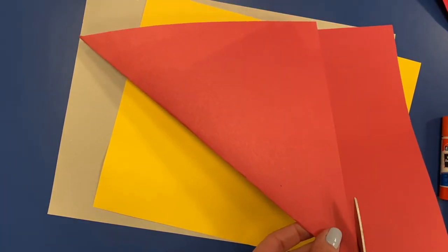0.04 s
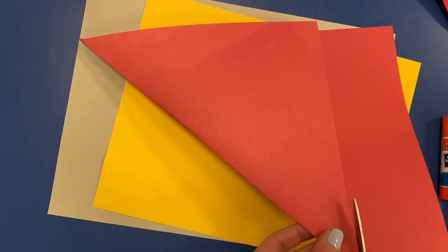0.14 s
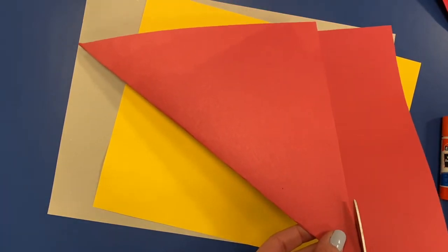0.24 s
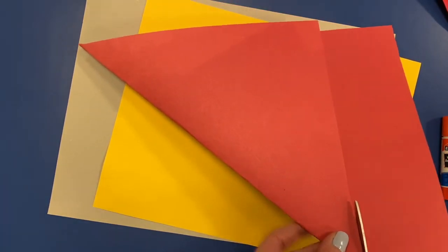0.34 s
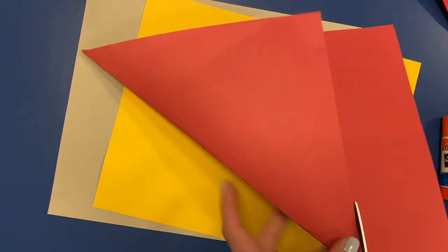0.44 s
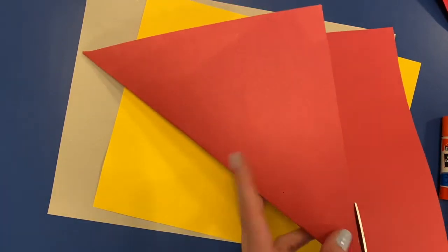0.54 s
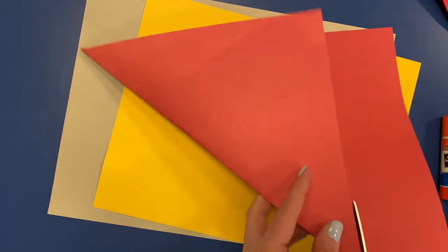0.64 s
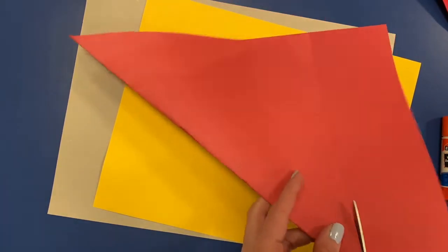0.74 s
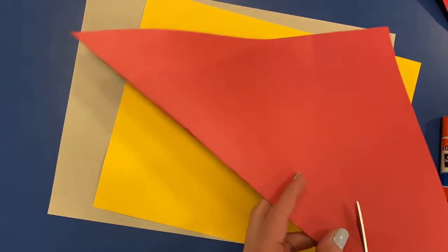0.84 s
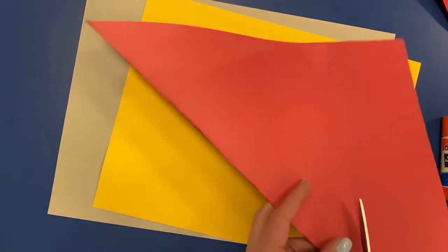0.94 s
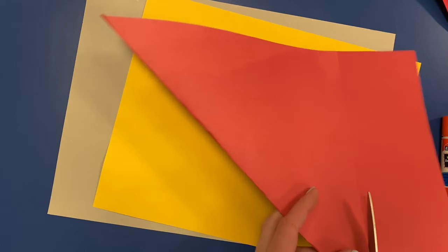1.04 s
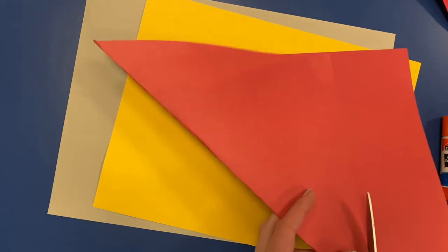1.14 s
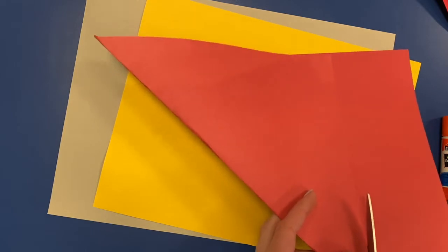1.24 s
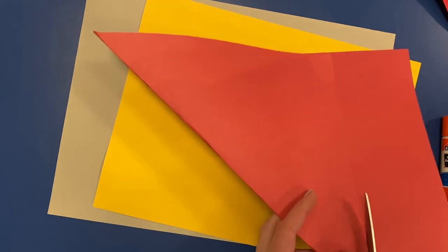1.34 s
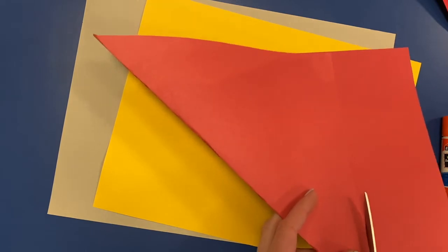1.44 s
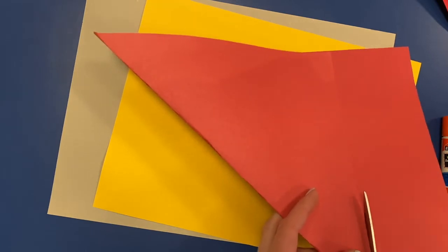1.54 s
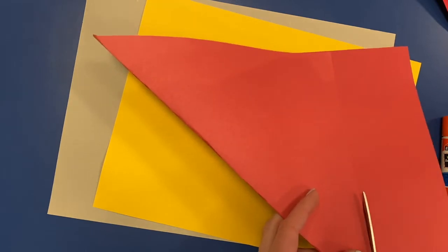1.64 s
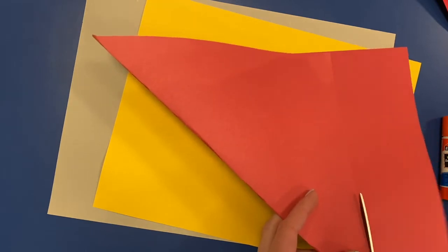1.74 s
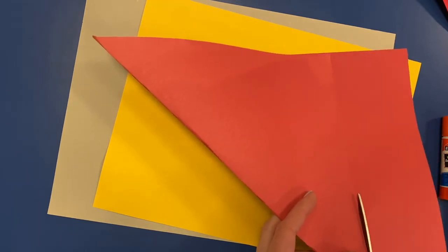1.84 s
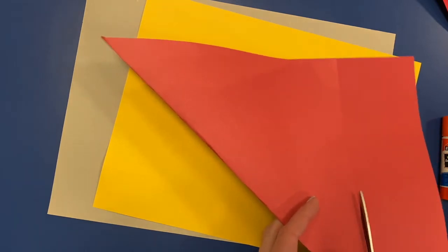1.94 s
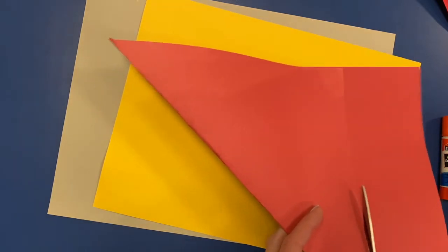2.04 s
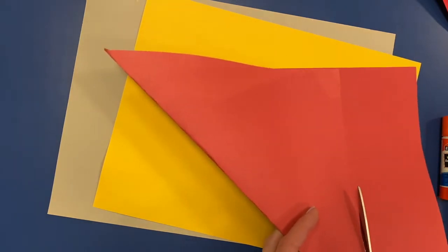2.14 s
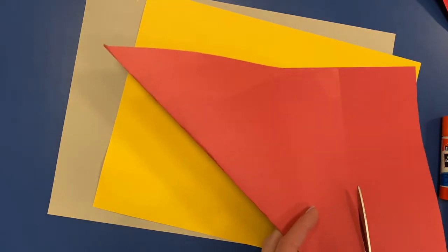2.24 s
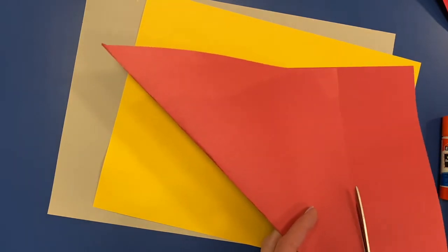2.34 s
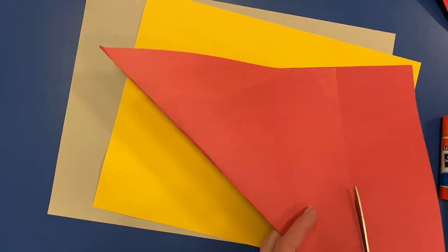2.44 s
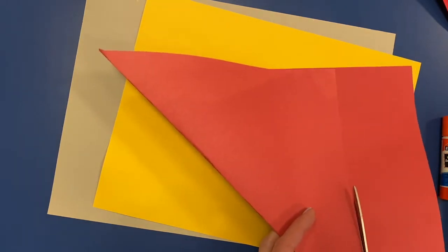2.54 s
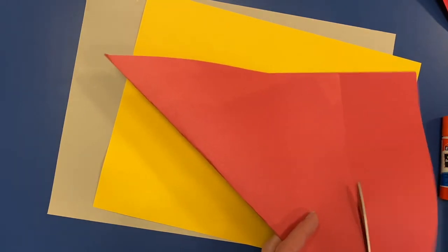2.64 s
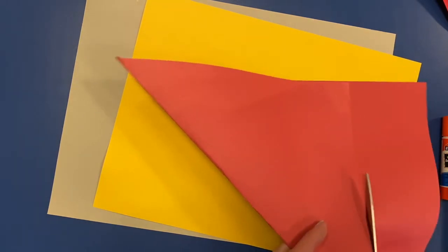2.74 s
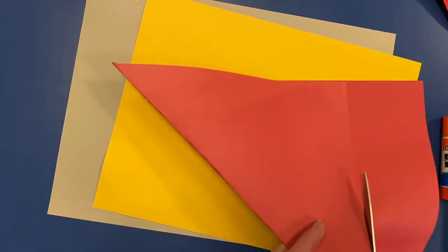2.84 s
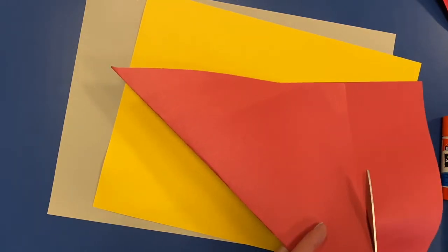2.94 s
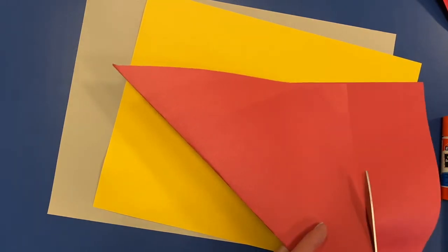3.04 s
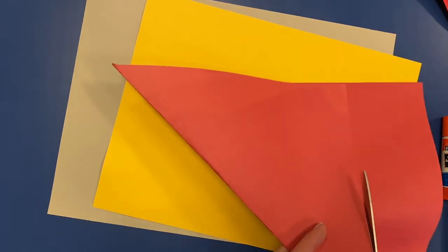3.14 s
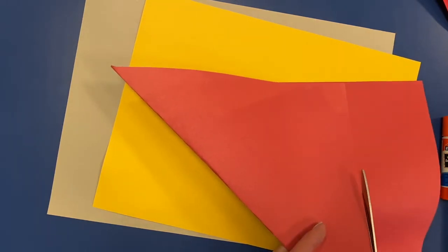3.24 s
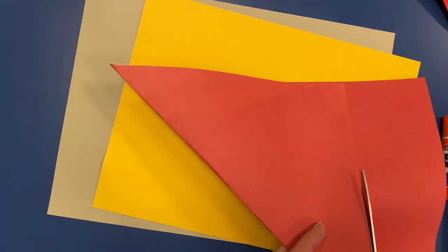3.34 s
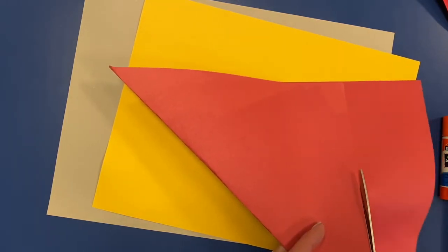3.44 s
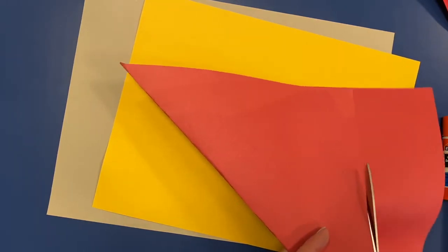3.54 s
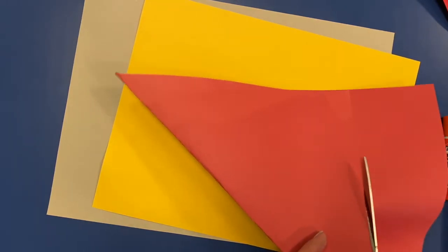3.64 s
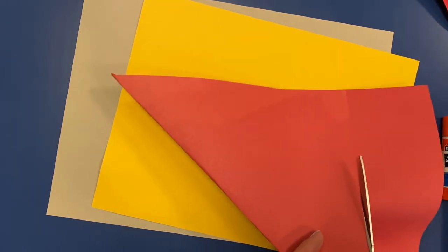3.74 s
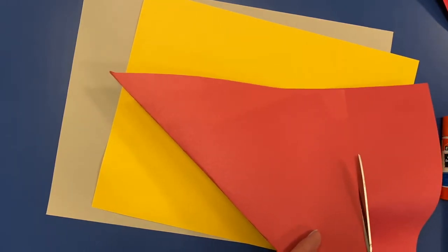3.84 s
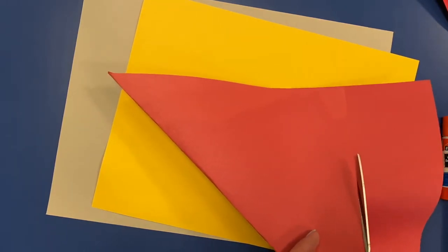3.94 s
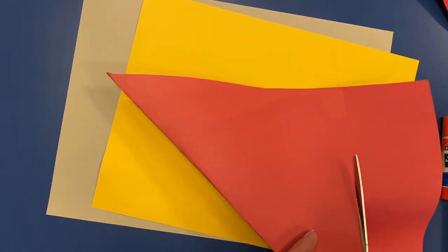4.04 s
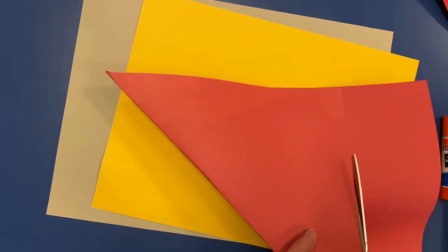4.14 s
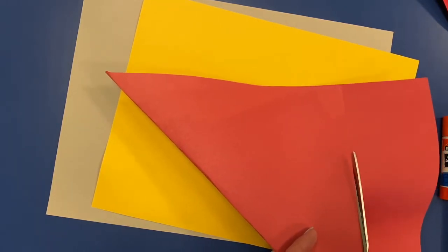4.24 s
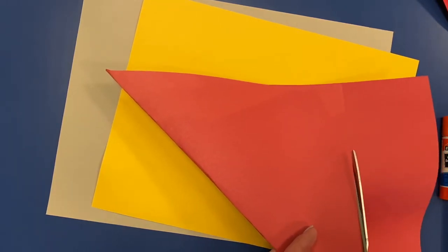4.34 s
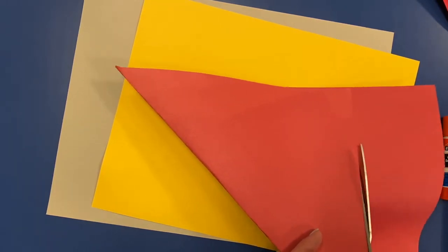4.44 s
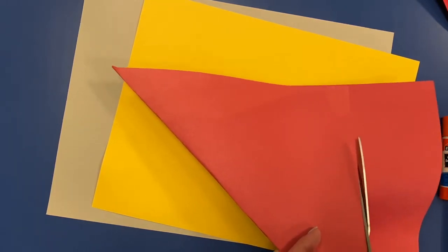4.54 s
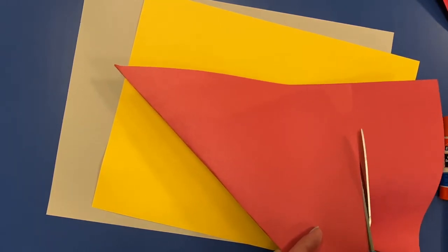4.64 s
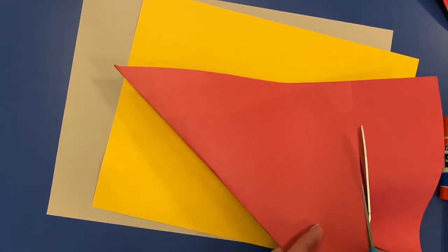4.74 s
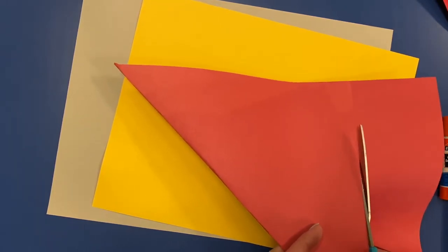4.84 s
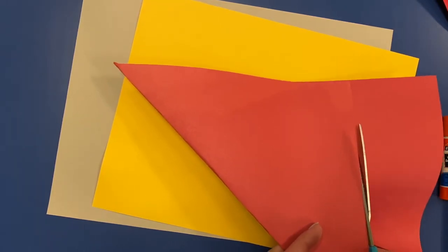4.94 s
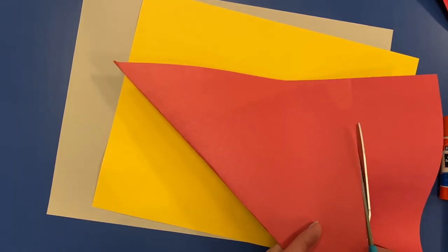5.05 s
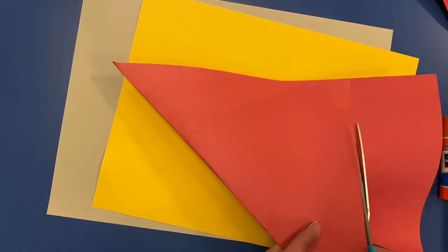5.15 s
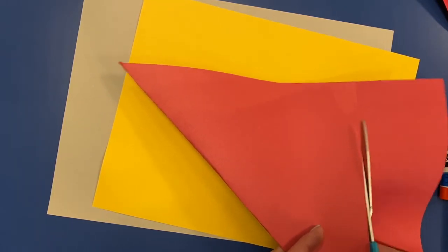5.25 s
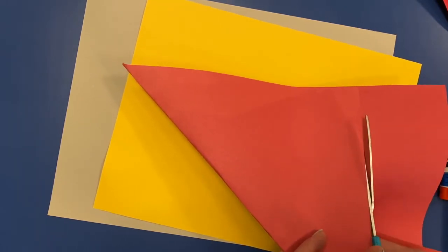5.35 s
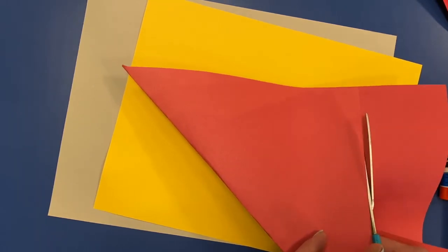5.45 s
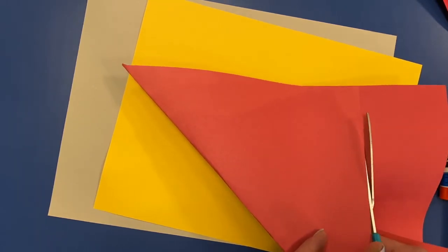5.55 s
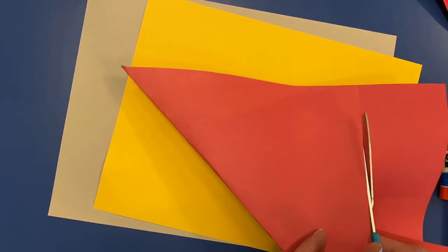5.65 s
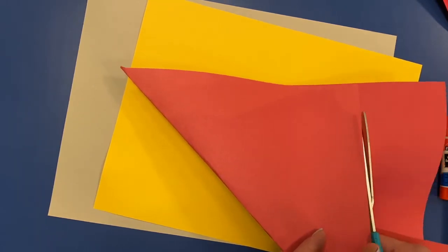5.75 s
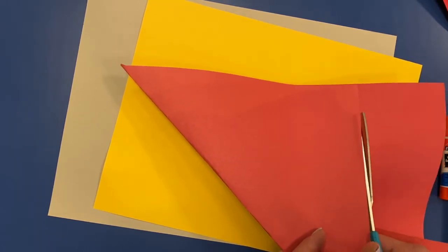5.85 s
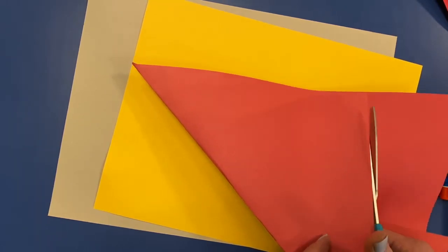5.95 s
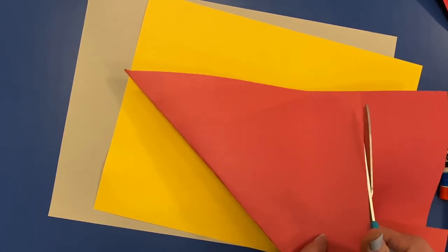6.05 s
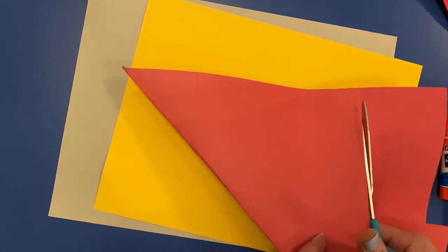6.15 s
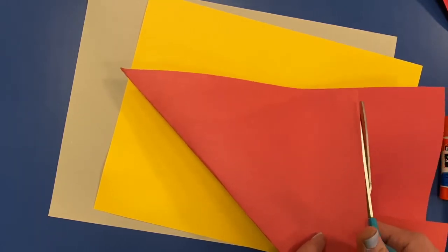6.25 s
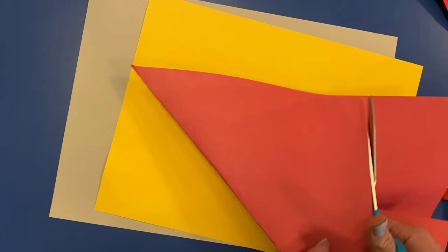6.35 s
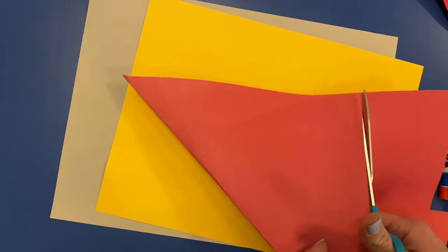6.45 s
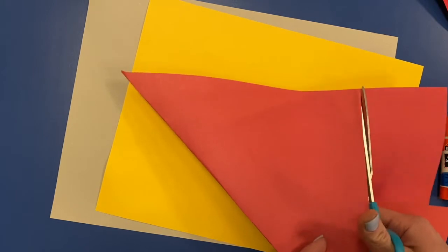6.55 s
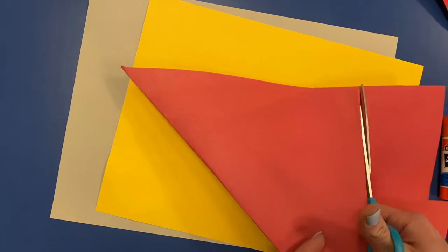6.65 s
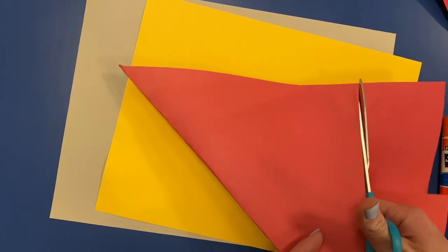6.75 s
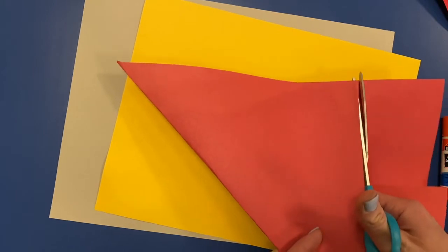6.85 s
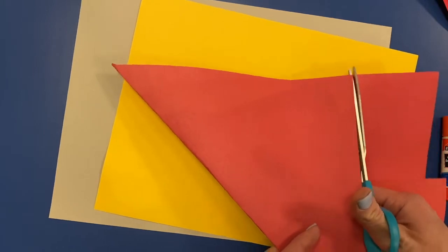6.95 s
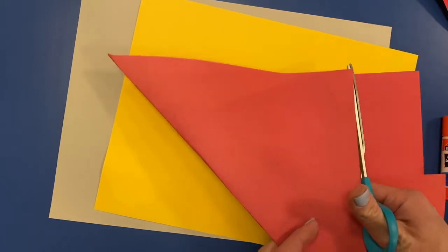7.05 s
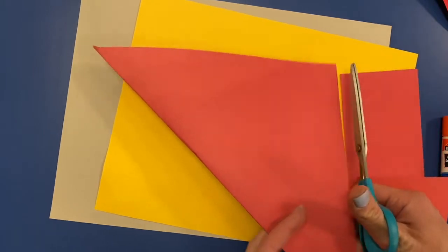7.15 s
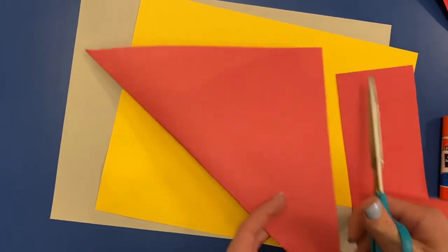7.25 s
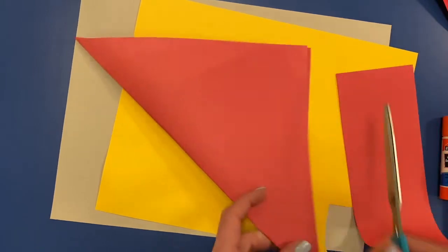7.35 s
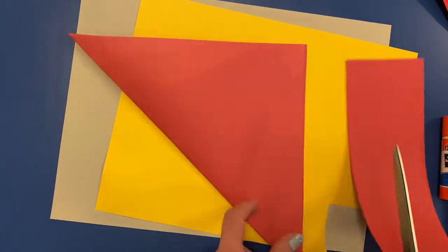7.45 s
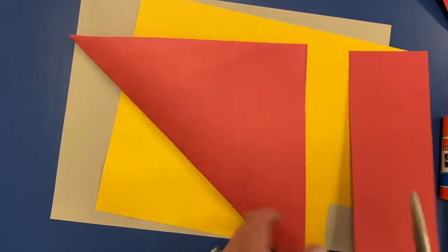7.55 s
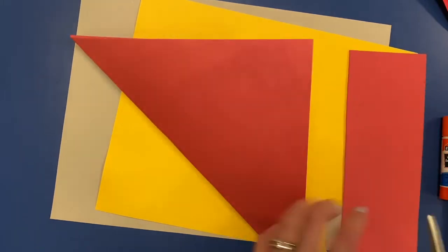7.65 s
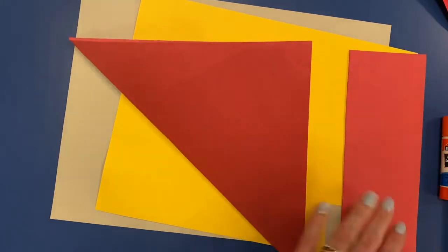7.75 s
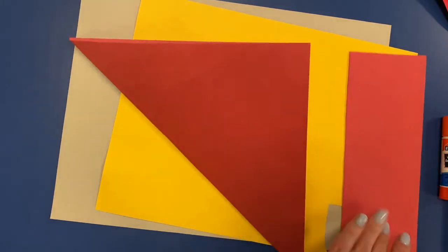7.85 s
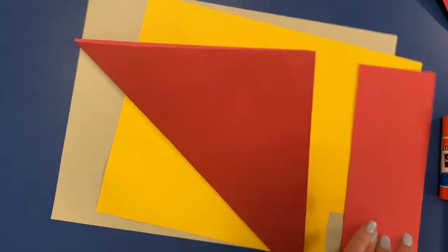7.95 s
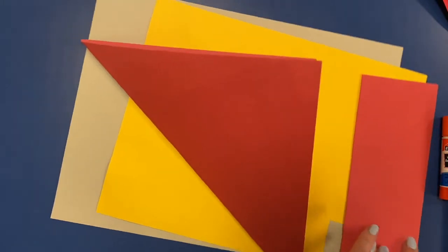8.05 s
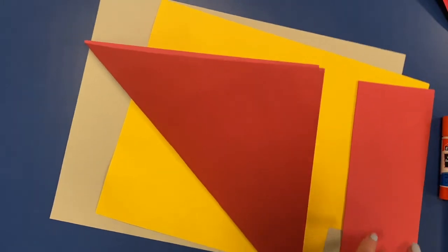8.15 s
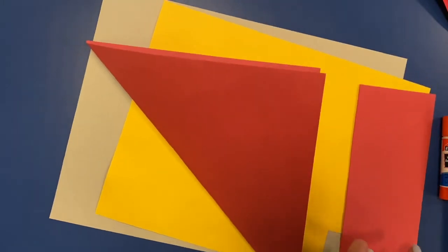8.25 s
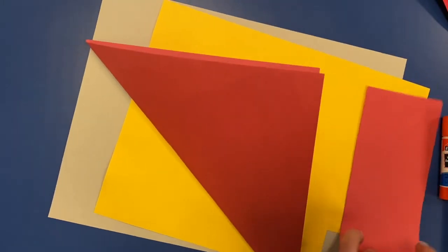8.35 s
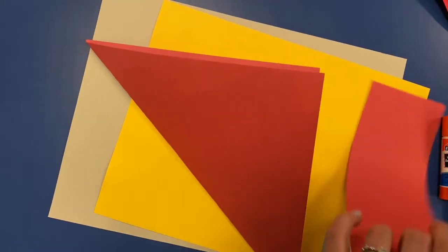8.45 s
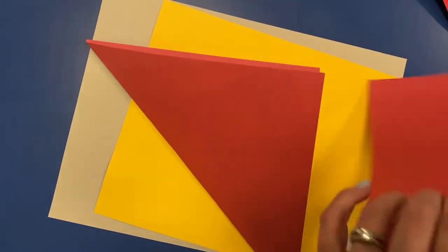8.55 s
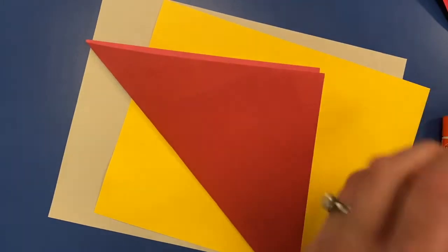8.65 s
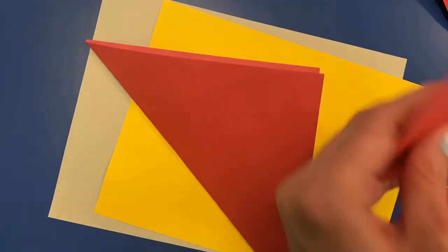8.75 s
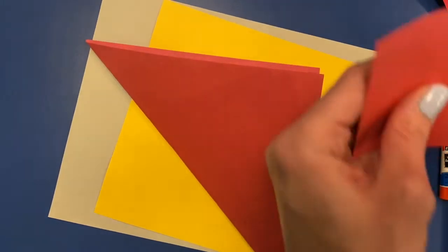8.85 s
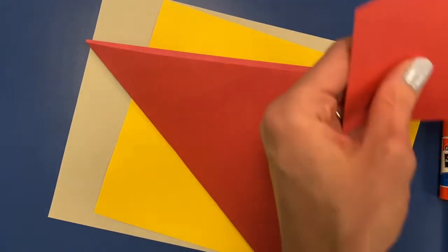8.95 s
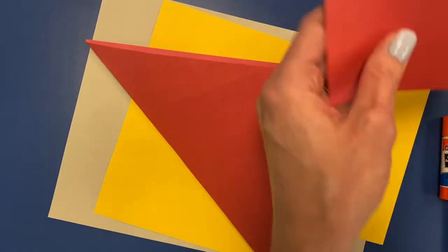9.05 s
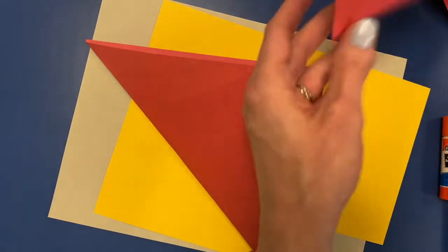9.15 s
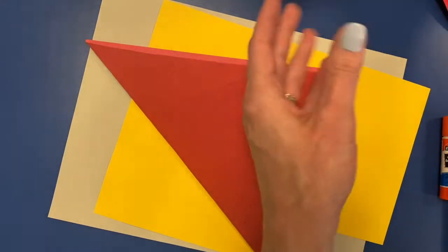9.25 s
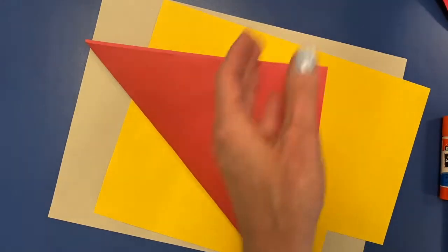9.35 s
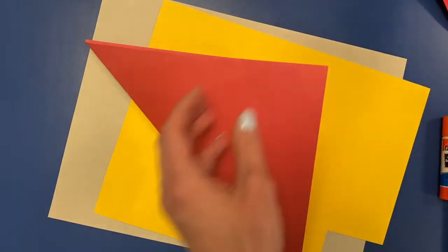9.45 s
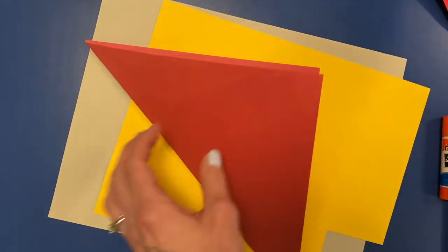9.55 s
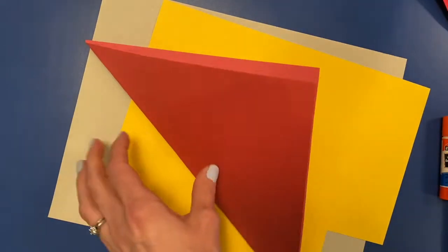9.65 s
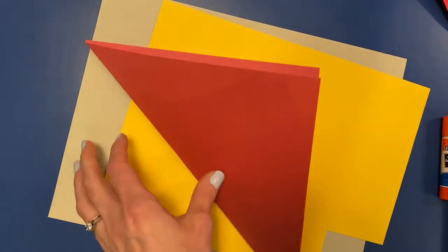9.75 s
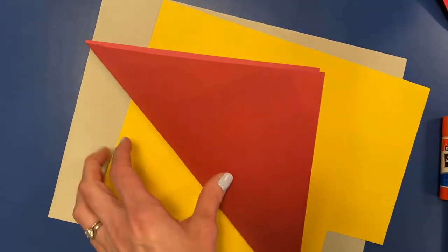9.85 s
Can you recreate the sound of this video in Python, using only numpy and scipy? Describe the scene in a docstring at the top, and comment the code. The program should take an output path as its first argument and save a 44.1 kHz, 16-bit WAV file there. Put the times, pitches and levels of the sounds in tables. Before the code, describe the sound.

Stiff paper rubs and rustles softly on a table, then scissors work through it in short uneven rasps with dry snaps and a slight metallic edge. The cuts grow louder towards a firm final snip. Afterwards the paper slides, snaps sharply once as the strip is lifted, and settles with faint rustles. Close stereo pickup in a small, quiet room with low ventilation hum.

```python
"""Short papery rasps and sharp snaps over a faint room hum: scissors work through a folded sheet of stiff
paper in jerky slips of the blades; the sheet rubs and rustles on a table, then hands lift the strip away.
Bursts of noise, shaped by force, excite resonances of sheet and blades and the colour of breaking fibres;
decaying tones make the thumps. A decaying-noise echo, ventilation noise and two wavering hum tones
surround them; paper and air are widened to stereo by phase, level and likeness of left and right."""
import sys
import numpy as np
from scipy import signal
from scipy.fft import rfft, irfft, next_fast_len
from scipy.io import wavfile
from scipy.ndimage import uniform_filter1d, map_coordinates

SR = 44100
rng = np.random.default_rng(int(sys.argv[2]) if len(sys.argv) > 2 else 0)


def transcribe(u):
    """Save the signal u as a 16-bit wav file named by the first command-line argument.

    u: samples, shape (n,) or (channels, n), limited to [-1, 1]; the rate is SR.
    q: integer samples, one column per channel.
    """
    v = np.clip(np.atleast_2d(u).T, -1, 1)
    q = np.round(v * 32767).astype(np.int16)
    wavfile.write(sys.argv[1], SR, q)


def volts(x):
    """Linear amplitude factor 10**(x/20) for a level x in dB, scalar or array-like."""
    e = np.asarray(x, float) / 20
    return 10 ** e


N = 436149

# Times between which the blades bite the sheet. Columns: start in seconds, end in seconds.
BLADES_IN = (1.28, 7.01)
# Stereo widening by frequency. Each row: frequency in Hz, phase by which the left leads in radians,
# left over right in dB, likeness of left and right from 0 to 1.
STEREO = [(200, 0, 0, .9), (500, .1, -.5, .8), (1500, 0, 0, .99), (2700, 1, -3, .7), (3600, .5, -1, .8),
          (4400, .9, -4.5, .65), (5000, .3, 0, .95), (6900, 3.07, 0, .998), (8100, 3.22, 0, .998),
          (10500, 6.28, 0, .99), (12800, 9.3, 0, .998), (14600, 9.55, 0, .998), (16000, 12.5, 0, .95)]


def unit(x):
    """Normalisation of power: scaled to rms 1."""
    return x / np.sqrt(np.mean(x ** 2) + 1e-20)


def along(hz, at_hz, values):
    """Interpolation on a logarithmic frequency axis."""
    return np.interp(np.log(hz + 1), np.log(np.add(at_hz, 1)), values)


def wobble(rate):
    """Band-limited fluctuation: a smooth curve through random knots, rate of them a second."""
    knots = rng.standard_normal(int(N * rate / SR) + 4)
    return map_coordinates(knots, [np.arange(N) * rate / SR])


def filtered(x, response):
    """Linear filtering: the spectrum of x times a complex response of frequency."""
    m = next_fast_len(N + 8192)
    spectrum = rfft(x, m) * response(np.fft.rfftfreq(m, 1 / SR))
    return irfft(spectrum, m)[..., :N]


def resonance(x, hz, q):
    """Two-pole resonance, scaled so that white noise keeps its power."""
    b, a = signal.iirpeak(hz, max(q, .3), SR)
    return signal.lfilter(b, a, x) * np.sqrt(SR * q / (np.pi * hz))


def strokes():
    """Stick-slip friction: force rises and falls in ramps; cuts jerk and are caught, slides trail off."""
    # Strokes of the blades and rubs of the hands. Each row: start in seconds, length in ms, crackle in dB,
    # swell from start to end in dB, drive of the sheet above crackle in dB.
    stroke_rows = [(0.028, 62, -70, -17, 15.5), (0.14, 138, -63, 10, 15), (0.268, 48, -70.5, 7, 15),
                   (0.395, 37, -53.5, -8, -7), (0.525, 170, -61.5, -4, -21), (0.625, 48, -47, -1.5, 7.5),
                   (0.697, 86, -55, -5, 12.5), (0.81, 40, -60.5, 0, 5), (0.856, 184, -52.5, -2, 2.5),
                   (1.036, 99, -53, -6, -1.5), (1.291, 18, -66.5, -11, 18), (1.319, 13, -57, 0, 8.5),
                   (1.351, 55, -56, 4, 8.5), (1.474, 40, -58.5, 13, 10.5), (1.534, 106, -56.5, 11, 10),
                   (1.864, 220, -50.5, 10, -2.5), (2.216, 46, -56.5, 0, 7), (2.302, 116, -51, -1, 7),
                   (2.559, 220, -51, 3.5, 4.5), (2.705, 50, -47.5, 3, 7.5), (2.761, 64, -56, -18.5, -5),
                   (2.876, 103, -55.5, -10, 3), (3.03, 82, -52, 2, 4.5), (3.165, 63, -49.5, 0, 5.5),
                   (3.235, 53, -52.5, 4, 6), (3.482, 160, -49, 9, 6.5), (3.64, 98, -60.5, -8, -1),
                   (3.832, 37, -50.5, -3, 5), (3.907, 50, -59.5, -10, 8), (4.131, 35, -48.5, -19, 5),
                   (4.18, 65, -42, 7.5, 6), (4.284, 200, -67.5, 3, 4), (4.399, 100, -49, -3, 2.5),
                   (4.504, 200, -53, 15.5, 6), (4.681, 35, -56, -2, -11), (4.937, 50, -52.5, -19, 8),
                   (5, 84, -48, 9, 7), (5.226, 120, -48.5, -9, 3.5), (5.34, 106, -55, -7, 7),
                   (5.649, 56, -46, -3, 9.5), (5.71, 54.5, -43.5, -4, 8), (5.871, 122, -47, 8.5, 6),
                   (6.104, 45, -35, 4.5, 9), (6.18, 31.6, -40, -5, 8), (6.212, 21, -61, 0, -2),
                   (6.299, 116, -45.5, 13, 10), (6.416, 56, -58, 9, 0), (6.456, 63, -38, -2, 11.5),
                   (6.534, 39, -68, -5, -7), (6.752, 100, -53, -3, 1.5), (6.953, 46.7, -34.5, -4.5, 3),
                   (7.02, 108, -63, 22, 7.5), (7.135, 130, -59.5, 9, -13), (7.234, 176, -50, -2, -21),
                   (7.345, 88, -46, 14, -6.5), (7.444, 91, -54, -3, -9), (7.71, 56, -58.5, 0, -11),
                   (7.875, 160, -67, -1, -15), (8.166, 140, -57.5, 2, -27), (8.266, 31, -56.5, -8, 5),
                   (8.38, 65, -44, 12, -21), (8.454, 99, -45.5, -13, -17), (8.553, 170, -72, -4, -5),
                   (8.689, 75, -59, 0, -10), (8.76, 40, -57, 0, -2), (8.826, 54, -60, 11, 1.5),
                   (8.905, 22, -56.5, -3, 1.5), (9.032, 79, -57.5, -3, -20), (9.175, 62, -86, -15, 33),
                   (9.283, 32, -58.5, -3, 3.5), (9.32, 63, -51.5, 5, 3), (9.615, 31, -60.5, -3, -19)]
    # Single snaps as fibres or a fold give way. Each row: start in seconds, length in ms, crackle in dB,
    # drive of the sheet above crackle in dB, fizz above crackle in dB.
    snap_rows = [(0.125, 9.6, -46.5, 5, -5.5), (0.34, 11, -50.5, 6, -14), (0.866, 12.3, -57, 13, -16),
                 (1.462, 9.3, -46.5, 9, -6), (1.497, 5, -62, -3, -4), (1.538, 10, -46.5, 0.5, -6),
                 (1.654, 9.2, -46, 5.5, -8), (2.205, 8.4, -44, 6, -7), (2.279, 11, -49, 10.5, -4),
                 (2.538, 3, -41, 6, 6), (2.627, 7.7, -63.5, 23, 1), (2.665, 16.7, -51, 18.5, -4),
                 (3.147, 9.9, -36, 4, -10), (3.297, 18, -42.5, 6, -4.5), (3.351, 3.1, -55, 3, -4),
                 (3.891, 17.5, -42.5, 7.5, -1), (3.942, 10, -50.5, 8.5, -1), (4.1, 9.6, -52.5, 8, -4),
                 (4.169, 8.6, -38.5, 8, 1), (4.253, 11, -40, 3, -3), (4.274, 6.5, -42, 4, -3),
                 (4.673, 3.3, -30.5, 9, -5), (4.925, 8.8, -33, 1, -10), (5.003, 7.3, -50, 15, -7),
                 (5.099, 19.5, -45, 8, -1), (5.127, 7, -39.5, 2, -9), (5.621, 21.3, -46, 10, -5),
                 (5.77, 20, -43.5, 7.5, -8), (6.154, 10.3, -29.5, 3, -12), (6.174, 4.8, -30.5, 6.5, -3),
                 (6.518, 14, -45, 10.5, -4), (6.926, 10, -48, -1.5, -23), (6.94, 10.8, -25.5, 0.9, -12),
                 (7.116, 22, -47.5, -16, -3), (7.435, 3.2, -42, -6, -1), (7.462, 3.3, -43, -7, -14),
                 (7.488, 4.7, -44, -3, -29), (7.693, 14, -44, 0.5, -11), (7.87, 6.9, -50, 4, -4),
                 (8.187, 3.4, -41, 2, -7), (8.293, 19, -47, -10, -18), (8.4348, 2, -16, -10, -7),
                 (8.4403, 2.9, -24.5, 2, 6), (8.443, 9.4, -18.5, -3, -22), (8.745, 5.4, -44, 1, 8.5),
                 (8.797, 26.3, -51, 8.5, -11), (8.966, 4.7, -48, 1, -17), (8.974, 15, -55.5, 18.5, -13),
                 (9.004, 21, -46.5, 9, -11), (9.146, 11, -56, 3.5, 6.5)]
    # The sheet's pitch and fizz drift over time, the pitch mostly rising until 8.5 s, then falling.
    # Each row: time in seconds, pitch at the usual force in Hz, fizz of strokes above crackle in dB.
    sheet_course = [(0, 935, -6), (1.5, 860, -7.5), (2.2, 1080, -5.5), (3.1, 1312, -6.5), (4.3, 1205, -3),
                    (5.5, 1240, -3.5), (6.002, 1360, -6.5), (7.0, 1350, -4.5), (7.4, 1440, -8),
                    (8.3, 1600, 2), (8.5, 1630, -18), (8.7, 1240, -7), (9.89, 1000, 0)]
    at_s, sheet_hz, stroke_fizz_db = np.transpose(sheet_course)
    arch_db_per_s = 14  # long strokes press hardest midway: drop at both ends for each second of length
    ticks_per_s, tick_size, tick_s = 160, 0.59, 0.0017  # rate, mean size over the rasp, decay time
    jerk_db, steady_ms = 3, 100  # jerk depth of a quick cut; longer strokes glide more evenly
    taut_per_db, usual_db = 0.01, -45.5  # a harder pull tightens the sheet: share of pitch a dB

    jerks = wobble(70)
    # tough fibres break alone
    struck = (rng.random(N) < ticks_per_s / SR) * rng.exponential(tick_size, N)
    ticks = 1 + signal.lfilter([1], [1, -np.exp(-1 / (tick_s * SR))], struck)

    long = [(s, ms, db, swell_db, sheet_db, np.interp(s, at_s, stroke_fizz_db))
            for s, ms, db, swell_db, sheet_db in stroke_rows]
    short = [(s, ms, db, 0, sheet_db, fizz_db) for s, ms, db, sheet_db, fizz_db in snap_rows]
    for s, ms, db, swell_db, sheet_db, fizz_db in long + short:
        length = ms / 1000
        hz = np.interp(s, at_s, sheet_hz) * np.exp(taut_per_db * (db - usual_db))
        edge = 0.0024 + 0.11 * length  # slow rubs swell more gently than quick jerks
        start = max(round((s - edge / 2) * SR), 0)
        t = np.arange(min(round((length * 1.3 + .02) * SR), N - start)) / SR
        span = slice(start, start + len(t))
        cutting = np.clip((sheet_db - .5) / 4, 0, 1)  # 0 for a slide, 1 for a cut
        fall = edge + 0.37 * (1 - cutting) * length
        shape = np.clip(t / edge, 0, 1) * np.clip((length + (edge + fall) / 2 - t) / fall, 0, 1)
        part = np.clip(t / length, 0, 1)  # share of the stroke done
        arch = -arch_db_per_s * length * (2 * part - 1) ** 2
        jerk = jerk_db * cutting / (1 + (ms / steady_ms) ** 2) * jerks[span]
        jerked = shape * ticks[span] * volts(swell_db * part + arch + jerk)
        # swell, ticks and jerks leave the energy of the stroke unchanged
        force = jerked * volts(db) * np.linalg.norm(shape) / np.linalg.norm(jerked)
        yield span, force, cutting, sheet_db, hz, fizz_db


def fibres(clump_rate, clump_db, patchy_db):
    """Clustered rupture: four independent noises share clumps in time and patches of pitch."""
    z = signal.stft(rng.standard_normal((4, N)), nperseg=128)[2]
    patches = uniform_filter1d(rng.standard_normal(z.shape[1:]), size=2, axis=0)
    patches = uniform_filter1d(patches, size=12, axis=1)
    noise = signal.istft(z * volts(patchy_db * unit(patches)), nperseg=128)[1][:, :N]
    return unit(noise * volts(clump_db * wobble(clump_rate)))


def drummed_sheet(drum, played):
    """Forced plate vibration: each stroke excites a moving and a fixed resonance of the sheet."""
    sheet = np.zeros(N)
    for span, force, _, sheet_db, hz, _ in played:
        push = force * volts(sheet_db) * drum[span]
        moving = resonance(resonance(push, hz, q=0.89), hz, q=0.89)
        sheet[span] += 0.31 * moving + 0.27 * resonance(push, 681, q=2.1)
    band = signal.butter(2, [330, 3000], "bandpass", fs=SR, output="sos")
    return signal.sosfilt(band, sheet)


def tearing(grain, played):
    """Fracture noise: force scales crackle below and fizz above a crossover, coloured by the fibres."""
    # Colour of tearing and scraping fibres. Each row: frequency in Hz, gain in dB.
    fibre_colour = [(300, -9.5), (1200, -1), (2600, 5.5), (3700, 4.5), (4200, 4), (4700, 5.5), (5600, 3),
                    (7500, 13.5), (10000, 6), (13000, 5.5), (15800, -1.5)]
    # Faint creep of the held paper between strokes. Each row: time in seconds, level in dB.
    creep_course = [(0, -63), (1.8, -64.5), (4.3, -63.5), (4.8, -68.5), (6.0, -61.5), (6.65, -59),
                    (7.65, -71), (8.45, -56), (9.89, -84)]
    # A shallow dip in the tearing noise near 4.1 kHz while the blades bite.
    # Columns: centre in Hz, width in Hz, gain in dB.
    dip_band = (4110, 550, -2.5)
    t = np.arange(N) / SR
    creep = volts(np.interp(t, *np.transpose(creep_course)))
    crackle, fizz = creep + 0, creep * volts(-5.5)
    for span, force, _, _, _, fizz_db in played:
        crackle[span] += force
        fizz[span] += force * volts(fizz_db)

    def low(hz):
        """Crossover: the share of crackle, the rest being fizz."""
        return 1 / (1 + (hz / 6700) ** 12)

    def colour(hz):
        """Spectral envelope of the breaking fibres."""
        return volts(along(hz, *np.transpose(fibre_colour)))

    torn = filtered(crackle * grain, lambda hz: colour(hz) * low(hz))
    torn = torn + filtered(fizz * grain, lambda hz: colour(hz) * (1 - low(hz)))
    at_hz, width_hz, dip_db = dip_band
    dipped = filtered(torn, lambda hz: volts(dip_db * np.exp(-((hz - at_hz) / width_hz) ** 2)))
    return np.where((BLADES_IN[0] < t) & (t < BLADES_IN[1]), dipped, torn)


def blade_ring(drum, played):
    """Driven resonance: strokes that start while the blades bite ring the metal, cuts the most."""
    blades = np.zeros(N)
    for span, force, cutting, _, _, _ in played:
        if BLADES_IN[0] * SR < span.start < BLADES_IN[1] * SR:
            blades[span] += force * (0.18 + 0.45 * cutting)
    return .5 * resonance(resonance(blades * drum, 5100, q=4), 5100, q=4)


def paper(grain, drum, played):
    """Superposition: the same strokes of force drive sheet, crackle, fizz and blades, through two noises."""
    return drummed_sheet(drum, played) + tearing(grain, played) + blade_ring(drum, played)


def thumps():
    """Damped free vibration: each buckle or bump is one tone, dying quickly as its pitch sinks."""
    # The sheet buckles, chirps or bumps the table. Each row: start in seconds,
    # level in dB before attack and decay, starting pitch in Hz, t60 in ms.
    thump_rows = [(.636, -28, 1000, 42), (.870, -29.5, 825, 25), (4.673, -19, 1130, 20),
                  (8.294, -27.5, 2350, 59), (8.441, -29.5, 124, 77), (8.444, -23, 650, 34),
                  (8.979, -29.5, 200, 24), (9.013, -32.5, 85.7, 83)]
    out, t = np.zeros(N + SR), np.arange(SR // 8) / SR
    attack = 1 - np.exp(-t / 0.00026)
    sag = 1 - 2.4 * t  # the pitch sinks as the sheet relaxes
    for s, db, hz, ms in thump_rows:
        decay = volts(db - 60 * t / (ms / 1000))
        out[round(s * SR):][:len(t)] += decay * attack * np.sin(2 * np.pi * hz * t * sag)
    return out[:N]


def widened(a, b, alike):
    """Partial coherence: left and right mix a shared and an unshared part, then differ in phase and level."""
    at_hz, lead, tilt_db, _ = np.transpose(STEREO)

    def turn(hz):
        """Mixing angle that gives the wanted coherence."""
        return np.arccos(np.clip(alike(hz), 0, 1)) / 2

    def half(hz):
        """Half of the level and phase difference, which the left gains and the right loses."""
        return volts(np.interp(hz, at_hz, tilt_db) / 2) * np.exp(.5j * np.interp(hz, at_hz, lead))

    mid, side = filtered(np.array([a, b]), lambda hz: np.array([np.cos(turn(hz)), np.sin(turn(hz))]))
    return filtered(np.array([mid + side, mid - side]), lambda hz: np.array([half(hz), 1 / half(hz)]))


def room(x):
    """Reverberation: convolution with noise in which each frequency dies at its own speed."""
    # Decay of the room. Each row: frequency in Hz, t60 in seconds.
    room_decay = [(300, 0.12), (2000, 0.23), (10000, 0.09)]
    hz, t, z = signal.stft(rng.standard_normal(SR // 2), SR, nperseg=256)
    t60 = along(hz, *np.transpose(room_decay))[:, None]
    tail = signal.istft(z * volts(-60 * t / t60), SR, nperseg=256)[1]
    delayed = np.pad(x, ((0, 0), (200, 0)))  # the echo starts 200 samples late
    return signal.fftconvolve(delayed, tail[None] / np.linalg.norm(tail), axes=1)[:, :N]


def mains_hum():
    """Modulated sinusoids: steady pitches whose level and phase waver at random."""
    # Hum tones. Each row: frequency in Hz, level in dB before a common lift of 1 dB, waver in dB.
    hum_tones = [(60.6, -53, 2.7), (181.7, -61, 2.5)]
    t = np.arange(N) / SR
    return sum(volts(db + 1.0 + waver_db * wobble(5.3)) * np.sin(2 * np.pi * hz * t + 1.83 * wobble(6))
               for hz, db, waver_db in hum_tones)


def air():
    """Broadband flow noise: ventilation rumble and hiss, coherent by frequency, with an unsteady hum."""
    # Spectrum of ventilation and distant room noise. Each row: frequency in Hz, relative density in dB.
    air_colour = [(25, -45), (40, -8), (64, -6), (100, -9), (184, -13), (450, -21), (1000, -24),
                  (1400, -31.5), (2200, -40), (6000, -43.5), (12000, -53), (16000, -89)]
    # Likeness of the air noise at left and right. Each row: frequency in Hz, likeness from 0 to 1.
    air_likeness = [(60, .998), (130, .985), (250, .8), (650, .2), (3000, .65), (6500, .997)]
    air_db, waver_db = -50.5, 0.17  # mean level and its slow waver
    noise = filtered(rng.standard_normal((2, N)), lambda hz: volts(along(hz, *np.transpose(air_colour))))
    a, b = unit(noise) * volts(air_db + waver_db * wobble(2.81))
    return widened(a, b, lambda hz: along(hz, *np.transpose(air_likeness))) + mains_hum()


def scene():
    """Superposition of direct sound, its echo and the room air, in stereo."""
    grain = fibres(clump_rate=400, clump_db=1.0, patchy_db=2.5)
    played = list(strokes())
    shared = paper(*grain[:2], played) + thumps()
    unshared = paper(*grain[2:], played)
    near = np.array([shared, unshared])
    near = near + volts(-15.5) * room(near)
    at_hz, _, _, likeness = np.transpose(STEREO)
    return widened(*near, lambda hz: np.interp(hz, at_hz, likeness)) + air()


def band_limit(x):
    """A steep low-pass at the top of the band."""
    return signal.sosfilt(signal.butter(12, 17120, fs=SR, output="sos"), x)


def record(dry):
    """Band limitation: the phone keeps nothing from 15900 Hz up."""
    limited = filtered(dry, lambda hz: hz < 15900)
    return band_limit(limited)


dry = scene()
out = record(dry)
transcribe(out)
```